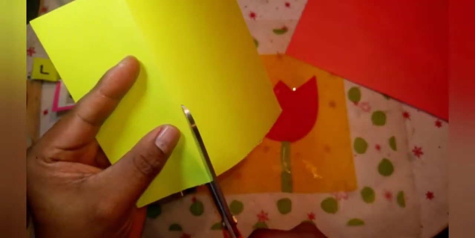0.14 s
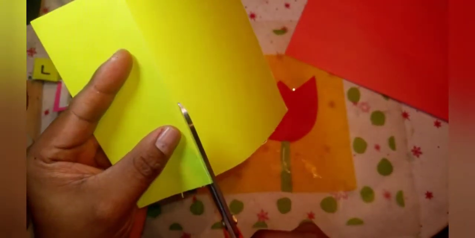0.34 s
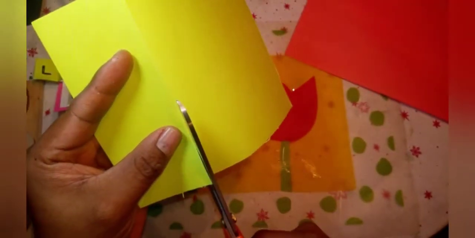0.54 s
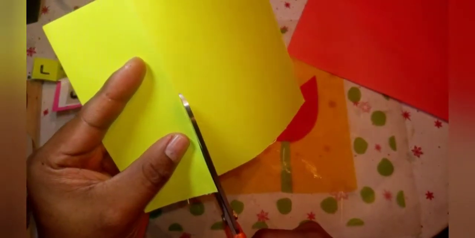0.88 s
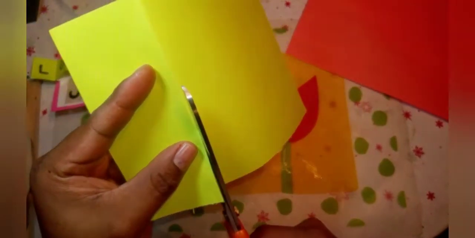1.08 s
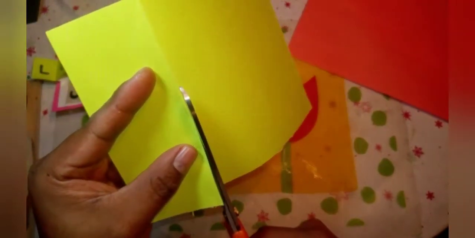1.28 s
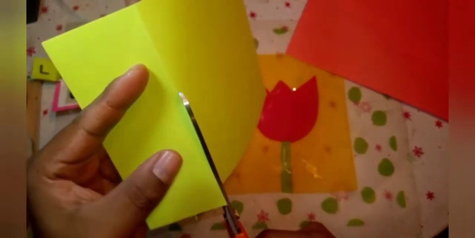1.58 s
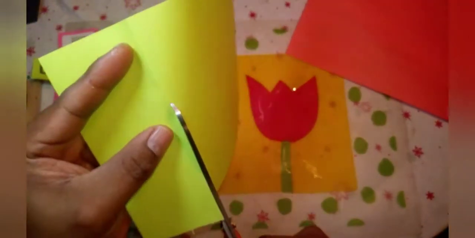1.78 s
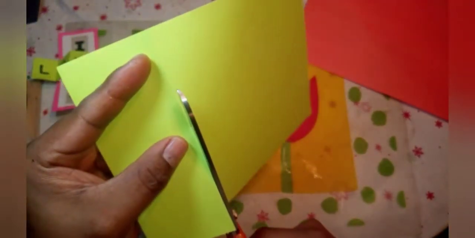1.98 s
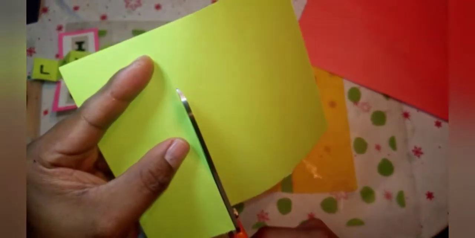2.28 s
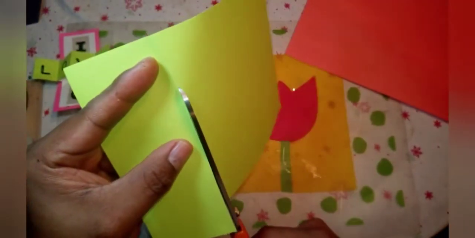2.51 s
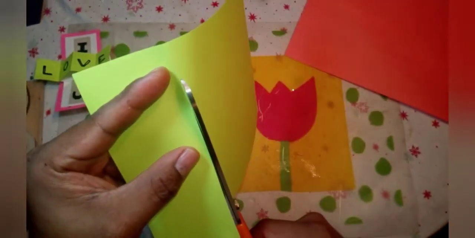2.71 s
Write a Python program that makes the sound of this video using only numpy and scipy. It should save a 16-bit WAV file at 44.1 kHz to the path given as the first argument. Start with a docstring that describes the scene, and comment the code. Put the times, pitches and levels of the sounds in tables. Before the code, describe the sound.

Crisp paper cutting with scissors, in three uneven strokes of rapid crackling snips separated by papery scrapes and near silence, recorded close and dry, almost mono, with faint room tone and low handling rumble.

```python
"""Scissors cut a hand-held sheet of paper close to the microphone, in a small quiet room.
Each closing advances in short bites: dense random clicks of snapping fibres excite the sheet's resonances.
Finer grains make the slide of blades on paper; lone clicks are hard ticks, and damped sines are flaps.
Behind lie filtered-noise room tone, a soft rumble of the hands and a thin, wavering sine whistle.
A moving reflection off the table and a short diffuse tail place the cutting in the room."""
import sys
import numpy as np
from scipy import signal
from scipy.fft import rfft, irfft
from scipy.io import wavfile

SR = 44100
rng = np.random.default_rng(int(sys.argv[2]) if len(sys.argv) > 2 else 0)


def log_audio(samples):
    """Write samples as a 16-bit WAV file to the path given in sys.argv[1]."""
    # one column per channel
    frames = np.atleast_2d(samples).T
    # limit to full scale, then quantise
    limited = np.clip(frames, -1, 1)
    pcm = np.round(limited * 32767).astype(np.int16)
    wavfile.write(sys.argv[1], SR, pcm)


N = 125685
TIME = np.arange(N) / SR


def from_db(db):
    """Decibels to amplitude gain."""
    return 10 ** (np.asarray(db) / 20)


def rms_one(x):
    """Scale a signal to an RMS of 1."""
    return x / np.sqrt(np.mean(x ** 2) + 1e-20)


def gain_at(points, size):
    """Spectrum table as gains on an FFT grid, interpolated in dB over log frequency."""
    hz, db = np.transpose(points)
    log_grid = np.log(np.fft.rfftfreq(size, 1 / SR) + 1)
    return from_db(np.interp(log_grid, np.log(hz), db))


def colour(x, points):
    """Shape a spectrum with a causal, minimum-phase filter, which keeps attacks sharp."""
    size = 2048
    cepstrum = irfft(np.log(gain_at(points, size)))
    # Folding the cepstrum onto positive time gives minimum phase.
    cepstrum[1:size // 2] *= 2
    cepstrum[size // 2 + 1:] = 0
    impulse = irfft(np.exp(rfft(cepstrum)))
    return signal.fftconvolve(x, impulse)[:len(x)]


def resonate(x, hz, width_hz):
    """One damped resonance with about unit gain at its peak; a narrower width rings longer."""
    radius = np.exp(-np.pi * width_hz / SR)
    numerator = np.array([1, 0, -1]) * (1 - radius * radius) / 2
    denominator = [1, -2 * radius * np.cos(2 * np.pi * hz / SR), radius * radius]
    return signal.lfilter(numerator, denominator, x + 1e-18)


def drift(rate_hz):
    """Smooth random wander with an RMS of 1: noise through a two-pole low-pass."""
    pole = np.exp(-2 * np.pi * rate_hz / SR)
    wander = signal.lfilter([1], [1, -2 * pole, pole * pole], rng.standard_normal(N + SR))
    return rms_one(wander[SR:])  # drop the filter's first second


def add(out, x, start_s):
    """Mix x into out at start_s, trimming whatever falls outside."""
    start = int(start_s * SR)
    x, start = x[max(-start, 0):], max(start, 0)
    out[start:start + len(x)] += x[:max(N - start, 0)]


# Room tone spectrum: pitch_hz [Hz], level_db [dB, relative]
ROOM_TONE_COLOUR = [(15, -65.5), (25, -32.5), (99, -1.5), (263, -6), (301, -9.5), (384, -9), (545, -19.5),
                    (1040, -15), (1290, -21.5), (3720, -30), (16000, -39)]
ROOM_TONE_DB = -73.5  # RMS


def room_tone():
    """Steady noise coloured by the quiet room."""
    return from_db(ROOM_TONE_DB) * rms_one(colour(rng.standard_normal(N), ROOM_TONE_COLOUR))


# Level curve of the hands: time_s [s], level_db [dB, before the trim]
RUMBLE_LEVEL = [(0.0, -83), (0.01, -76.5), (0.39, -60.5), (0.48, -76), (1.29, -76), (1.35, -65), (1.4, -76),
                (1.69, -64), (1.73, -55.5), (1.76, -74), (2.19, -77), (2.36, -59.5), (2.52, -76.5),
                (2.85, -67)]
# Rumble spectrum: pitch_hz [Hz], level_db [dB, relative]
RUMBLE_COLOUR = [(20, -21), (50, -2.5), (130, 0.5), (220, -11), (500, -32.5), (2000, -66.5)]
RUMBLE_TRIM_DB = -1


def hand_rumble():
    """Low handling noise, swelling and sinking along a level curve."""
    rumble = rms_one(colour(rng.standard_normal(N), RUMBLE_COLOUR))
    level_db = np.interp(TIME, *np.transpose(RUMBLE_LEVEL))
    return rumble * from_db(RUMBLE_TRIM_DB + level_db)


# Path of the far whistle: time_s [s], pitch_hz [Hz], level_db [dB]; waver and flicker wander around it
WHISTLE_PATH = [(0, 3339, -68.5), (.3, 3279, -68.5), (0.749, 3717, -74.5), (1.049, 3409, -60.5),
                (1.11, 3420, -72), (1.16, 3702, -72.5), (1.46, 3729, -73.5), (2.051, 3743, -82),
                (2.189, 3678, -77.5), (2.4, 3320, -62), (2.455, 3287, -61.5), (2.49, 3423, -61.5),
                (2.601, 3331, -66), (2.791, 3290, -65.5), (2.85, 3300, -63.5)]
WHISTLE_WAVER_HZ, WHISTLE_FLICKER_DB = 52, 3  # RMS wander of pitch and level
OCTAVE_DB = -14  # below the fundamental


def whistle():
    """A thin sine with a faint octave, its pitch and level wandering at random."""
    time_s, pitch_hz, level_db = np.transpose(WHISTLE_PATH)
    pitch = np.interp(TIME, time_s, pitch_hz) + WHISTLE_WAVER_HZ * drift(150)
    phase = 2 * np.pi * np.cumsum(pitch) / SR
    level = from_db(np.interp(TIME, time_s, level_db) + WHISTLE_FLICKER_DB * drift(60))
    return level * (np.sin(phase) + from_db(OCTAVE_DB) * np.sin(2 * phase))


# Spectrum of the room's tail: pitch_hz [Hz], gain_db [dB]
ROOM_COLOUR = [(100, -4), (600, 4.5), (2000, 0.5), (7000, -1.5), (15000, 1.5)]
ROOM_T60_S, ROOM_DELAY_S = 0.2113, .004
ROOM_DB = -12  # tail gain before its colour


def room(x):
    """A short diffuse tail: the sound convolved with decaying noise."""
    t = TIME[:SR // 2]
    tail = rng.standard_normal(len(t)) * from_db(-60 * t / ROOM_T60_S) * (t > ROOM_DELAY_S)
    tail = tail / np.sqrt(np.sum(tail ** 2))
    return from_db(ROOM_DB) * colour(signal.fftconvolve(x, tail)[:N], ROOM_COLOUR)


# Reflection off the table as the sheet is moved: time_s [s], delay_s [s]
ECHO_DELAY = [(.35, .00136), (.7, .00144), (1.15, .00184), (1.45, .00184), (1.6, .0023), (1.75, .00225),
              (2.15, .00183)]
ECHO_SHARE = 0.237  # amplitude relative to the direct sound


def table_echo(x):
    """The sound plus one close reflection whose delay shifts, combing the spectrum."""
    delay_s = np.interp(TIME, *np.transpose(ECHO_DELAY))
    echo = np.interp(TIME - delay_s, TIME, x)
    return (x + ECHO_SHARE * echo) / np.sqrt(1 + ECHO_SHARE ** 2)


# Flaps of the sheet as a cut gives way: start_s [s], pitch_hz [Hz], level_db [dB, where the decay starts]
FLAPS = [(.593, 678, -37.5), (.6895, 760, -35), (1.386, 317.3, -47.5), (2.324, 1052, -29.5),
         (2.331, 365, -30.5)]
FLAP_CYCLES = 2.97  # cycles per 20 dB of decay


def flaps():
    """Soft, quickly damped sine thumps of the sheet, each fading in over one cycle."""
    out, t = np.zeros(N), TIME[:SR // 10]
    for start_s, pitch_hz, level_db in FLAPS:
        cycles = t * pitch_hz
        decay = from_db(level_db - 20 * cycles / FLAP_CYCLES)
        add(out, decay * np.sin(2 * np.pi * cycles) * np.minimum(cycles, 1), start_s)
    return out


def snaps(size, per_s, spread_db):
    """Random clicks of either sign, most small and a few large."""
    sizes = from_db(spread_db * np.minimum(rng.exponential(1, size), 4))
    return (rng.random(size) < per_s / SR) * sizes * rng.choice([-1, 1], size)


# Ringing of sheet and blades: pitch_hz [Hz], width_hz [Hz], gain_db [dB, before ring_db is added]
SHEET_MODES = [(1066.8, 46, 2.5), (1509, 49.8, 4.5), (1721.8, 15, -0.5), (2184.5, 105, 4.5), (2670, 123, 0),
               (2981, 100, -1.5), (4779, 180, 0.5), (5584, 110, 3.5), (6254, 90, 3), (6477, 110, 2),
               (7264, 250, -3.5)]


def sheet(x, ring_db):
    """The plain clicks plus the modes that they set ringing."""
    ringing = sum(from_db(gain_db + ring_db) * resonate(x, pitch_hz, width_hz)
                  for pitch_hz, width_hz, gain_db in SHEET_MODES)
    return x + ringing


# Edges of the bass, middle and treble bands: low_hz [Hz], high_hz [Hz]
BANDS = [(150, 900), (900, 3500), (3500, 17000)]


def three_bands(x, levels_db, length_s):
    """Bass, middle and treble of x, each set to its RMS level as if spread over length_s."""
    bands = []
    for edges_hz, level_db in zip(BANDS, levels_db):
        band = signal.sosfilt(signal.butter(3, edges_hz, "band", fs=SR, output="sos"), x)
        bands.append(from_db(level_db) * band * np.sqrt(length_s * SR / (np.sum(band ** 2) + 1e-20)))
    return bands


# Blades sliding on paper: start_s [s], rise_s [s], hold_s [s], fade_s [s to -60 dB],
# bass_db, middle_db, treble_db [dB, before flutter and echo], scrape_hz [Hz]
SLIDES = [(-.01, 0.0075, 0.0115, 0.1346, -73, -61, -57.5, 6898),
          (.085, 0.0059, 0.0171, 0.29, -71.5, -61.5, -63, 1550),
          (.134, 0.0037, 0.0103, 0.1541, -70.5, -54.5, -55, 2868),
          (0.18, 0.0034, 0.0107, 0.1334, -66.5, -54, -56, 2910),
          (.215, 0.0042, 0.0134, 0.1662, -69, -54.5, -55.5, 2730),
          (.36, 0.017, 0.118, 0.8, -71, -62, -63, 6750), (0.781, 0.0295, 0.012, 0.2, -75, -63, -66.5, 2640),
          (0.814, 0.0076, 0.1352, 0.35, -69, -51.5, -52, 2606),
          (1.191, 0.017, 0.1414, 0.01, -68, -65, -63, 2195),
          (1.44, 0.045, 0.0202, 3.64, -76.5, -74.5, -68, 6380),
          (1.53, 0.0735, 0.0738, 0.22, -69.5, -64, -56, 6370),
          (1.69, 0.024, 0.1077, 0.4, -66, -60, -59, 2180),
          (1.849, 0.0047, 0.0446, 0.3766, -74, -54, -55, 3185),
          (2.5, 0.0114, 0.0106, .1, -76.5, -58, -71, 2200),
          (2.505, 0.0308, 0.0297, 0.425, -73, -54, -55.5, 2186),
          (2.628, 0.0188, 0.0106, 0.4, -67, -62, -72, 1880),
          (2.685, 0.0145, 0.0091, 0.47, -72.5, -62, -65.5, 2300)]
# Colour of the rubbing, ahead of the band levels: pitch_hz [Hz], gain_db [dB]
RUB_COLOUR = [(100, -9), (300, -9.5), (550, 0), (950, -14.5), (1500, -3), (2400, -1.5), (3300, 2),
              (4200, -2.5), (6900, -0.5), (8300, -15.5), (12500, -33.5), (15500, -26)]
GRAINS_PER_S, GRAIN_SPREAD_DB = 14000, 2.5
SCRAPE_WIDTH_HZ, SCRAPE_DB = 445, -1
RUB_FLUTTER_DB = 1.0  # RMS wander of level


def slides():
    """Steel rubs over paper: fine, dense grains under a rise, a hold and a fade, with a light flutter."""
    out, t = np.zeros(N), TIME[:SR * 6 // 10]
    for start_s, rise_s, hold_s, fade_s, *levels_db, scrape_hz in SLIDES:
        fade = from_db(-60 * np.maximum(t - rise_s - hold_s, 0) / fade_s)
        speed = np.minimum(t / rise_s, 1) * fade
        grains = sheet(speed * snaps(len(t), GRAINS_PER_S, GRAIN_SPREAD_DB), ring_db=-8)
        grains = grains + from_db(SCRAPE_DB) * resonate(grains, scrape_hz, SCRAPE_WIDTH_HZ)
        effective_s = np.sum(speed ** 2) / SR
        add(out, sum(three_bands(colour(grains, RUB_COLOUR), levels_db, effective_s)), start_s)
    return out * from_db(RUB_FLUTTER_DB * drift(35))


# Ticks of hard fibres or of the blades: start_s [s], level_db [dB, click before filtering]
CRACKS = [(.382, -24), (.391, -24), (.5563, -3), (0.562, -3), (0.564, -1), (1.6933, -22), (2.057, -33)]
# Colour of a fibre snap, for cracks and bites: pitch_hz [Hz], gain_db [dB]
SNAP_COLOUR = [(100, -18), (250, -12), (420, -2.5), (850, -6.5), (1300, 1.5), (3000, 1), (4200, -3.5),
               (7000, 0), (8200, -13.5), (12500, -27), (15500, -28)]


def cracks():
    """Lone sharp ticks: single impulses through a broad bright resonance."""
    out = np.zeros(N)
    for start_s, level_db in CRACKS:
        add(out, from_db([level_db]), start_s)
    return colour(resonate(out, 7500, 2200), SNAP_COLOUR)


# Bites of the blades: start_s [s, nominal], length_s [s],
# bass_db, middle_db, treble_db [dB, before echo], main_hz [Hz, main resonance of the sheet]
BITES = [(0.28, 0.018, -71.5, -48.5, -49, 629), (0.338, 0.0204, -60.5, -50.5, -45.5, 624),
         (0.397, 0.0036, -73, -48.5, -53.5, 584), (0.418, 0.0066, -60.5, -49, -47.5, 690),
         (0.444, 0.01396, -68.5, -45.5, -48.5, 650), (0.478, 0.01146, -68.5, -51, -52.5, 643),
         (0.518, 0.0157, -55.5, -45.5, -43, 639), (0.552, 0.01814, -50, -44, -41, 640),
         (0.584, 0.0131, -45, -43, -42, 705.4), (0.61, 0.00945, -54, -46, -52, 472),
         (0.632, 0.00947, -46.5, -42.5, -43.5, 694), (0.679, 0.01401, -45.5, -40, -43, 717.5),
         (1.16, 0.0051, -66, -62, -54, 510), (1.177, 0.01625, -64.5, -52, -51, 516),
         (1.21, 0.0168, -54, -46, -46.5, 620.6), (1.244, 0.0148, -56, -48.5, -47, 614),
         (1.276, 0.0112, -55, -45, -44, 629), (1.319, 0.01484, -50, -40, -46, 627),
         (1.349, 0.0146, -45.5, -45.5, -46, 534), (1.375, 0.00395, -64, -54, -53, 550),
         (1.385, 0.00756, -51.5, -48, -50.5, 538), (1.398, 0.0042, -60.5, -57.5, -54.5, 432),
         (1.516, 0.01127, -49.5, -41, -46.5, 631), (1.697, 0.0118, -52.5, -50, -45, 600),
         (1.713, 0.00562, -45, -54, -66, 595), (1.752, 0.0052, -55.5, -50.5, -63.5, 602.5),
         (2.197, 0.00806, -45, -42.5, -51, 548.4), (2.221, 0.01395, -55.5, -50.5, -51.5, 572),
         (2.253, 0.01164, -45.5, -44, -47, 597.4), (2.277, 0.01445, -43, -41.5, -43.5, 633),
         (2.318, 0.01624, -39, -39, -45, 548.6), (2.354, 0.01412, -51, -41.5, -42, 589.2),
         (2.381, 0.0087, -58.5, -49, -61.5, 514)]
BITE_ATTACK_S, BITE_RELEASE_S = 0.00532, 0.00331
BASS_LAG_S, TREBLE_LEAD_S = 0.0020574, .001  # after and before the nominal start
SNAPS_PER_S, SNAP_SPREAD_DB = 7000, 3
MAIN_WIDTH_HZ, MAIN_DB = 91, 11.5
LOW_EDGE_SHARE = 0.572  # of the main resonance: the sheet radiates little below it


def bites():
    """Fibres snap in a quick swell, hold steady, then die away fast; the sheet's bass follows a moment later."""
    out, t = np.zeros(N), TIME[:SR // 10]
    for start_s, length_s, bass_db, middle_db, treble_db, main_hz in BITES:
        attack = np.minimum((t / min(BITE_ATTACK_S, length_s / 2)) ** 0.712, 1)
        release = np.exp(-np.maximum(t - length_s * 0.805, 0) / BITE_RELEASE_S)
        fibres = attack * release * snaps(len(t), SNAPS_PER_S, SNAP_SPREAD_DB)
        main_ring = from_db(MAIN_DB) * resonate(fibres, main_hz, MAIN_WIDTH_HZ)
        ringing = sheet(fibres, ring_db=-2.5) + main_ring
        low_cut = signal.butter(2, LOW_EDGE_SHARE * main_hz, "high", fs=SR, output="sos")
        snapping = colour(signal.sosfilt(low_cut, ringing), SNAP_COLOUR)
        bass, middle, treble = three_bands(snapping, (bass_db, middle_db, treble_db), length_s)
        add(out, middle + treble, start_s - TREBLE_LEAD_S)
        add(out, bass, start_s + BASS_LAG_S)
    return out


# Left-right difference: pitch_hz [Hz], level_db [dB relative to the middle]
WIDTH = [(100, -69.5), (3500, -70), (5000, -46), (8000, -39), (15000, -16.5)]


def scene():
    """Mix all layers nearly mono; only the treble has a little width."""
    cutting = table_echo(bites() + cracks() + slides()) + flaps()
    mid = cutting + room(cutting) + whistle() + room_tone() + hand_rumble()
    # A quarter-cycle phase shift keeps left and right equally loud.
    side = irfft(1j * rfft(mid) * gain_at(WIDTH, N), N)
    return np.array([mid + side, mid - side])


def record(dry):
    """Cut the top steeply with an elliptic low-pass."""
    cutoff_hz = 15900
    low_pass = signal.ellip(12, .2, 70, cutoff_hz, fs=SR, output="sos")  # .2 dB ripple, 70 dB rejection
    return signal.sosfilt(low_pass, dry)


dry = scene()
out = record(dry)
log_audio(out)
```